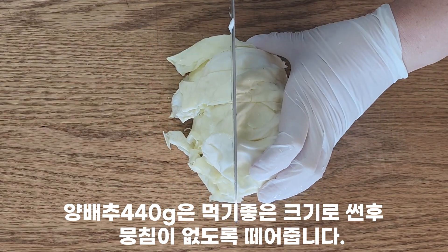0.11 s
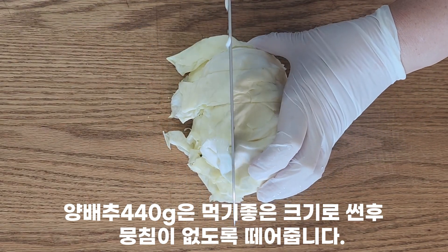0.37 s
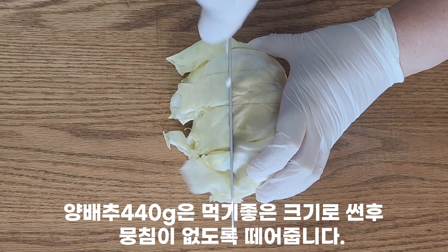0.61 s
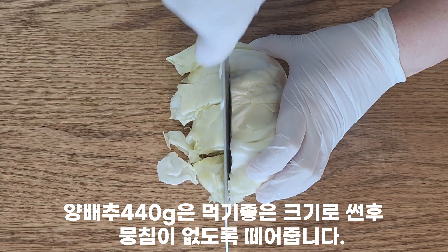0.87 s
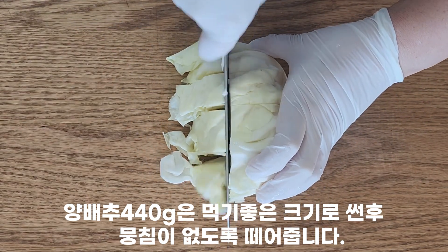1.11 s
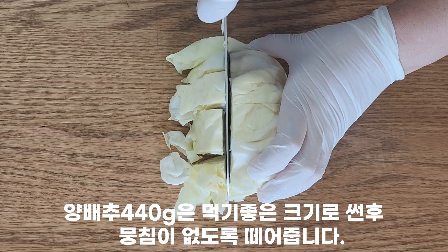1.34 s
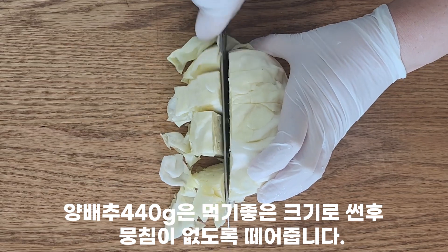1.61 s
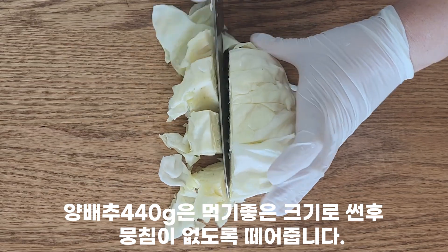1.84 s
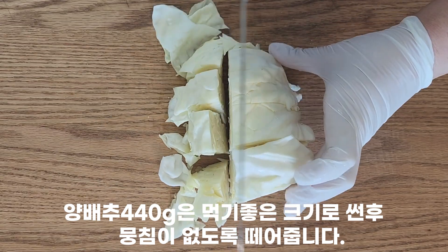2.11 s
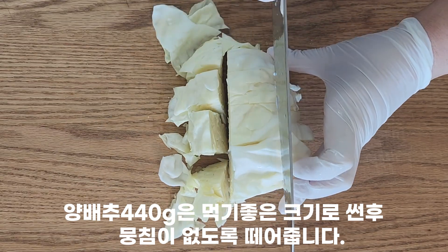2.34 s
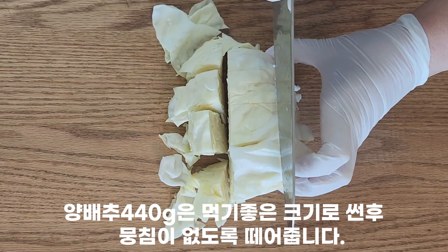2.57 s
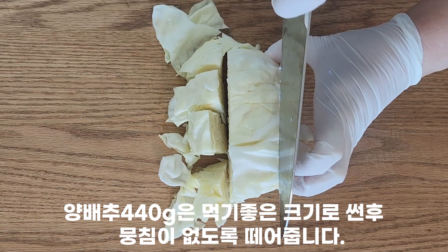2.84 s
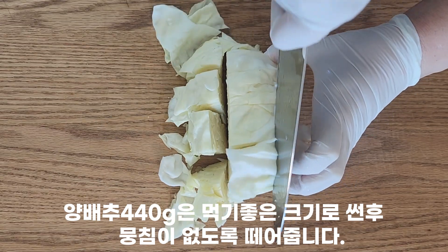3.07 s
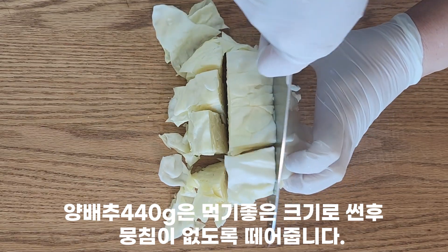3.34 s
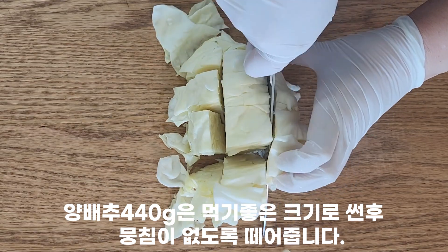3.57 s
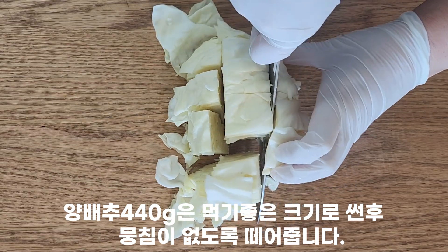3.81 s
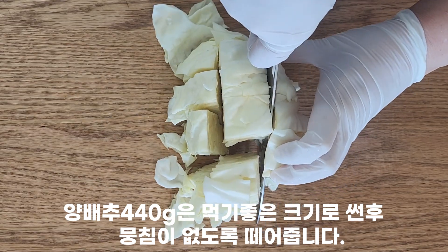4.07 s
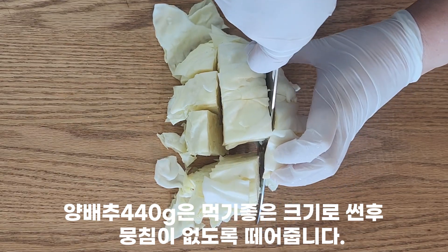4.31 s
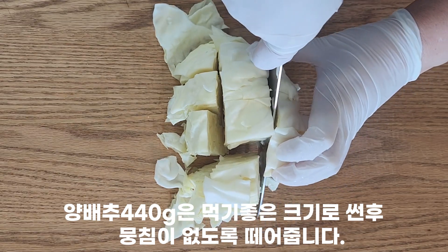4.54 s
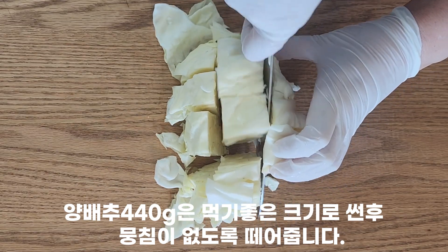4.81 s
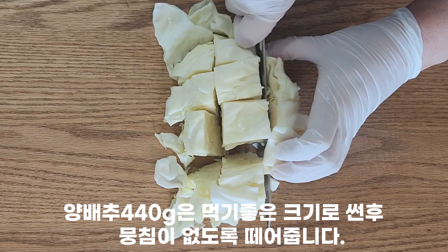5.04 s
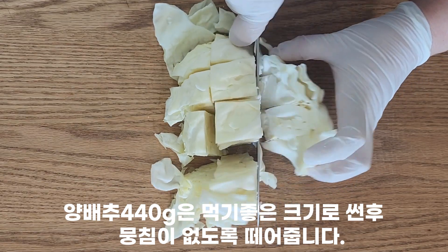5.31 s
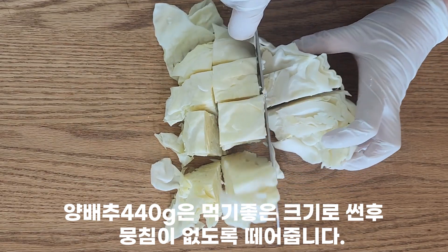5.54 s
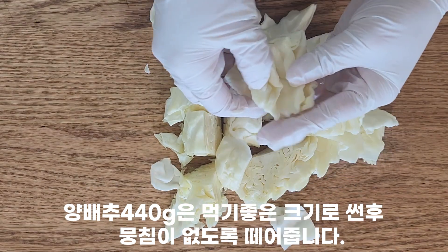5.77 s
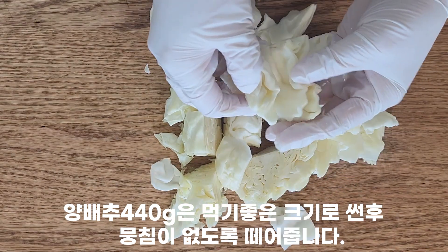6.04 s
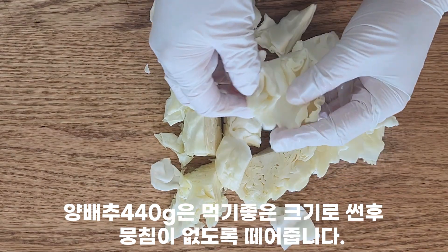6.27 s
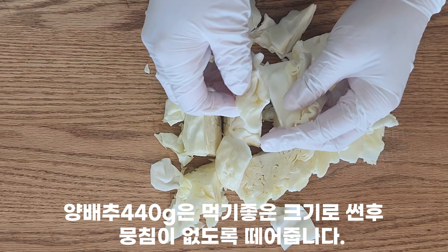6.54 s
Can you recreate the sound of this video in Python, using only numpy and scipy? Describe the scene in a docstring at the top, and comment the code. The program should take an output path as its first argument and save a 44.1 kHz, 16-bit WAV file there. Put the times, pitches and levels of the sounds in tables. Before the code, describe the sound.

Close stereo pickup of a knife forced through raw cabbage on a wooden board. A sharp crack opens a wet, crunchy cut ending in a knock; a second, louder cut follows, then a final hard chop with a strong snap. Low table rumble accompanies the pressure. Afterwards gloved hands peel and tear leaves with light squeaky crackles. The kitchen is hard-walled and lively, with a faint appliance drone.

```python
"""Knife through raw cabbage

A knife is forced through raw cabbage on a wooden board: leaves crunch (clumped random impulses) and ribs snap
(noise bursts with short rings). The blade lands three times (damped board modes), the table rumbles under the
pressure (swelling low noise), then gloved hands pull leaves apart. A hard-walled kitchen answers with decaying
noise tails over a quiet appliance drone; of two close microphones, the left is a little nearer."""
import sys
import numpy as np
from scipy import signal
from scipy.fft import rfft, irfft, next_fast_len
from scipy.io import wavfile
from scipy.ndimage import uniform_filter1d, map_coordinates

SR = 44100
rng = np.random.default_rng(int(sys.argv[2]) if len(sys.argv) > 2 else 0)


def invert_db(x):
    """Field ratio 10**(x/20) for x, a level in decibels (scalar or array-like)."""
    u = np.asarray(x, float) / 20
    return 10 ** u


def generate_wav(signal):
    """Clip the signal to [-1, 1] and save it as 16-bit WAV at the path in sys.argv[1]."""
    frames = np.transpose(np.atleast_2d(signal))
    scaled = np.clip(frames, -1, 1) * 32767
    pcm = np.round(scaled).astype(np.int16)
    wavfile.write(sys.argv[1], SR, pcm)


N = 293265

# spectrum of bursting leaf skin: (frequency [Hz], relative density [dB per Hz])
SKIN_SPECTRUM = [(1470, -44), (2500, -14), (2980, -10.5), (3580, -5.5), (5140, -6), (8320, -9.5),
                 (10200, -13), (15600, -13)]
# delays of the right microphone for three places on the board: (delay [samples], ...)
RIGHT_DELAYS = (3, 5, 8)


def unit(x):
    """Normalization by the root mean square, which becomes 1."""
    return x / np.sqrt(np.mean(x ** 2) + 1e-20)


def along(points, hz):
    """Interpolation of (frequency, value) points on a logarithmic frequency axis."""
    f, v = np.transpose(points)
    return np.interp(np.log(hz + 1), np.log(f + 1), v)


def wobble(rate):
    """Band-limited random modulation: a smooth curve through `rate` random knots a second."""
    knots = rng.standard_normal(int(N * rate / SR) + 4)
    return map_coordinates(knots, [np.arange(N) * rate / SR])


def swell(s, rise, fall, db):
    """Amplitude envelope: a gain that climbs to its peak at s and sinks again."""
    depth_db, roundness = 32.5, 1.45  # drop one rise or fall from the peak; 1 = pointed, 2 = round
    t = np.arange(N) / SR - s
    distance = np.where(t < 0, -t / abs(rise), t / abs(fall))
    return invert_db(db - depth_db * distance ** roundness)


def filtered(x, response):
    """Linear filtering: the spectrum is multiplied by a response of frequency."""
    m = next_fast_len(x.shape[-1] + 8192)
    return irfft(rfft(x, m) * response(np.fft.rfftfreq(m, 1 / SR)), m)[..., :x.shape[-1]]


def diffuse(pair):
    """Diffuse-field coherence: unrelated signals are mixed to share bass between the sides but not treble."""
    # (frequency [Hz], left-right correlation [ratio])
    likeness = [(30, 0.81), (60, 0.99), (130, .9), (290, .77), (640, 0.24), (1400, 0.013)]
    turn = lambda hz: np.arccos(np.clip(along(likeness, hz), -1, 1)) / 2
    mid, side = filtered(pair, lambda hz: np.array([np.cos(turn(hz)), np.sin(turn(hz))]))
    return np.array([mid + side, mid - side])


def near(x, pan_db, lag):
    """Interaural-like level and time differences: a close source is louder left and later right."""
    return np.array([x, np.roll(x, lag)]) * invert_db([[pan_db / 2], [-pan_db / 2]])


def grains(rate, spread_db, clump_db, spectrum):
    """Shot noise of bursting cells: clumped random impulses of uneven but bounded size, coloured by a spectrum."""
    size = invert_db(spread_db * np.minimum(rng.exponential(1, N), 3))
    burst = (rng.random(N) < rate / SR) * rng.standard_normal(N) * size
    clumps = invert_db(clump_db * (wobble(77) + wobble(22)))
    return unit(filtered(burst * clumps, lambda hz: invert_db(along(spectrum, hz))))


def drone():
    """Stationary noise of an appliance, shaped by a spectrum and slightly wavering, with a thin pure tone."""
    # (frequency [Hz], relative density [dB per Hz])
    air_spectrum = [(15, -40.5), (25, -0.5), (107, 0), (133, -6), (210, 0.5), (361, -7.5), (413, -10.5),
                    (652, -13), (788, -21.5), (854, -23.5), (3030, -25.5), (3660, -30), (4420, -24),
                    (5950, -28.5), (15700, -40.5)]
    # thin tone: (frequency [Hz], mean level of the two sides [dB])
    whine_tone = (15096, -86)
    air_db = -59.5
    noise = rng.standard_normal((2, N))
    air = unit(diffuse(filtered(noise, lambda hz: invert_db(along(air_spectrum, hz)))))
    whine_hz, whine_db = whine_tone
    phase = 2 * np.pi * whine_hz * np.arange(N) / SR + [[0], [1.6]]  # the right leads by 1.6 rad
    whine = np.sqrt(2) * invert_db(whine_db + .8 * wobble(8)) * np.sin(phase)
    whine = whine * invert_db([[2.5], [-2.5]])
    return invert_db(air_db + 1.7 * wobble(4.314)) * air + whine


def kitchen(x, piece):
    """Reverberation as decaying noise: each piece of sound gets a fresh tail with its own t60 per frequency."""
    # (frequency [Hz], t60 [s])
    decay_times = [(60, 0.22), (250, 0.55), (1000, 0.59), (2200, 0.53), (3000, 0.4), (6000, 0.49),
                   (14000, 0.51)]
    out = np.zeros((2, N + 2 * SR))
    for i in range(0, N, piece):
        hz, t, z = signal.stft(rng.standard_normal((2, SR * 3 // 4)), SR, nperseg=256)
        decay = invert_db(-60 * t / along(decay_times, hz)[:, None])
        tail = diffuse(signal.istft(z * decay, SR, nperseg=256)[1])
        wet = signal.fftconvolve(x[None, i:i + piece], tail / np.linalg.norm(tail[0]), axes=1)
        out[:, i + 130:][:, :wet.shape[1]] += wet  # the answer starts 130 samples late
    return out[:, :N]


def table():
    """Forced vibration: pressure on the blade shakes the table in uneven lumps; a wavering hum joins late."""
    # (frequency [Hz], relative density [dB per Hz])
    rumble_spectrum = [(15, -24.5), (25, 0.5), (43, 0.5), (59, 9), (81, -3), (134, 0.5), (173, -8),
                       (297, -14.5), (350, -27.5), (460, -38), (770, -120)]
    # weight on the blade: (peak time [s], rise [s], fall [s], level [dB])
    pushes = [(.22, .05, 0.049, -57), (.29, 0.049, .12, -53.5), (.43, 0.036, 0.096, -36),
              (.558, 0.029, 0.02, -38.5), (0.779, 0.33, 0.32, -34), (1.17, 0.096, 0.27, -35),
              (1.505, 0.065, 0.017, -38), (1.6, .05, 0.12, -56), (1.81, 0.24, 0.037, -60.5),
              (1.882, .03, 0.19, -58), (2.69, .15, .1, -58), (2.974, 0.27, 0.065, -57),
              (3.11, 0.098, 0.26, -36.5), (3.29, 0.044, 0.096, -33.5), (3.475, 0.15, 0.074, -34),
              (3.63, 0.042, 0.047, -45), (3.706, 0.02, 0.085, -40.5), (3.896, 0.15, 0.049, -49),
              (4.631, .08, 0.17, -54), (4.898, .02, 0.05, -28.5), (5.0, 0.14, 0.086, -40),
              (5.065, 0.066, 0.055, -39), (5.2, 0.11, 0.099, -43.5), (5.772, 0.048, 0.32, -51.5),
              (6.088, .04, 0.076, -63), (6.2, .12, 0.092, -57)]
    # hum while the hands work: (peak time [s], rise [s], fall [s], level [dB], frequency [Hz])
    hum_swells = [(5.789, .1, 0.12, -47, 95), (5.95, 0.21, .13, -52.5, 93), (6.09, 0.085, .08, -56, 96.7),
                  (6.25, 0.21, 0.22, -58, 103.1), (6.511, 0.24, .13, -59, 106)]
    noise = rng.standard_normal((2, N))
    shake = diffuse(filtered(noise, lambda hz: invert_db(along(rumble_spectrum, hz))))
    rumble = sum(swell(*row) for row in pushes) * unit(shake * invert_db(0.46 * wobble(30)))
    hum = sum(swell(*row) * np.sin(2 * np.pi * hz * np.arange(N) / SR) for *row, hz in hum_swells)
    return rumble + np.sqrt(2) * invert_db(1.3 * wobble(60)) * hum


def settling():
    """Sparse shot noise: cut leaves shift and tick faintly all the while; rows: left, right, room feed."""
    tick = invert_db(-72.5) * grains(46, spread_db=1.0, clump_db=5.5, spectrum=SKIN_SPECTRUM)
    return np.vstack([near(tick, 1.5, RIGHT_DELAYS[1]), tick])


def rubbing():
    """Sliding friction: the flat of the blade rubs cut leaf in fine grains; rows: left, right, room feed."""
    # (frequency [Hz], relative density [dB per Hz])
    blade_spectrum = [(700, -39.5), (1100, -12.5), (1500, -9), (2200, 1.5), (2600, -8.5), (3200, -19.5),
                      (6000, -64.5)]
    # (peak time [s], rise [s], fall [s], level [dB])
    rubs = [(1.9, 0.24, 0.069, -63.5), (2.66, 0.035, .06, -61), (2.9, 0.41, .15, -65),
            (3.07, 0.08, 0.11, -46.5), (3.87, 0.24, 0.15, -51.5), (4.38, 0.09, 0.11, -59.5),
            (4.55, 0.25, 0.28, -62), (4.74, 0.053, 0.064, -64.5), (4.95, 0.18, 0.17, -43)]
    friction = grains(1200, spread_db=-1.0, clump_db=2.0, spectrum=blade_spectrum)
    rub = sum(swell(*row) for row in rubs) * friction
    return np.vstack([near(rub, 1.2, RIGHT_DELAYS[1]), rub])


def slips():
    """Stick-slip friction: each creak is a run of small snaps that come faster and louder."""
    # edge on leaf skin, glove on wet leaf:
    # (start [s], end [s], first gap [s], level at the end before scatter and crest [dB], mean ring [Hz])
    creaks = [(2.7215, 2.936, .029, -39, 2470), (5.735, 5.826, 0.014, -27, 4700),
              (6.097, 6.135, 0.0051, -29.5, 5500)]
    gap_shrink = .93  # next gap over the last
    growth_db, scatter_db, crack_db = 8, 2, -12
    rows = []
    for (start, end, gap, db, hz), chance in zip(creaks, rng.standard_normal((len(creaks), 16))):
        times = start + gap * (1 - gap_shrink ** np.arange(len(chance))) / (1 - gap_shrink)
        for s, c in zip(times, chance):
            if s <= end:
                level = db - growth_db * (end - s) / (end - start) + scatter_db * c
                rows.append((s, level, hz * (1 + 0.0596 * c), crack_db))
    return rows


def snaps():
    """Brittle fracture: each rib breaks with a broad crack and a brief ring; rows: left, right, room feed."""
    # single ribs: (time [s], level before the crest [dB], ring [Hz], crack treble before its crest [dB])
    ribs = [(0.193, -45, 5710, -14), (0.2746, -19.5, 1900, -12), (0.3494, -40, 2180, -12),
            (0.3666, -35.5, 1920, -3), (0.3835, -27.5, 3120, -8.5), (0.4124, -33.5, 1980, -13),
            (0.4359, -38, 1590, -14.5), (0.4633, -39, 2050, -15), (0.5053, -36, 1500, -15),
            (0.5487, -36.5, 1580, -7), (0.5846, -29.5, 7460, -11), (0.6045, -32.5, 7380, -9),
            (1.1079, -35.5, 1010, -15), (1.477, -31, 1030, -12.5), (1.7454, -35, 1870, -16),
            (2.4927, -45.5, 4510, -19), (2.6564, -43, 2110, -16.5), (2.803, -39.5, 2270, -11),
            (2.8419, -34.5, 2240, -15), (2.8714, -32.5, 3660, -16.5), (2.9049, -31.5, 3940, -16.5),
            (2.9532, -23.5, 2510, -21), (2.9564, -23, 3590, -21.5), (3.0265, -26.5, 5730, -12),
            (3.0495, -25, 2080, -14), (3.0664, -24.5, 2230, -15.5), (3.1163, -18.5, 2240, -12.5),
            (3.2505, -28.5, 3690, -13), (3.2665, -25, 1200, -16), (3.2819, -26, 2210, -14),
            (3.3967, -32, 1130, -11), (3.8674, -36, 1980, -15), (4.4687, -38, 4380, -11.5),
            (4.5246, -39.5, 2100, -13), (4.5521, -38, 6150, -11), (4.7336, -42, 2440, -12),
            (4.8544, -32.5, 2080, -19), (4.8928, -34, 2270, -15), (4.9432, -31.5, 1310, -21),
            (5.0564, -15.5, 1340, -16), (5.3244, -35, 1850, -24), (5.4575, -42.5, 1280, -10.5),
            (5.5154, -39.5, 1270, -12.5), (5.6251, -43, 4280, -20), (5.8631, -35, 6270, -10),
            (5.9668, -37, 5440, -7), (5.9933, -32.5, 3570, -15), (6.0634, -48, 5030, -13),
            (6.0856, -35, 5010, -2.5), (6.2632, -41, 4970, -9), (6.5161, -43, 5370, -10),
            (6.5595, -40, 5660, -10)]
    crest_db, crack_crest_db = 3.5, 13  # added to the level and to the treble
    body_db, thin_db_per_octave = -3, 7  # thin ribs ring higher and have less body
    ring_cycles, break_s = 10, 0.0049  # cycles to fall 60 dB; t60 of the fibres parting
    out, t = np.zeros((3, N + SR)), np.arange(SR // 40) / SR
    breaks = [*ribs, *slips()]
    noise = rng.standard_normal((len(breaks), len(t)))
    for (s, db, hz, crisp_db), fizz in zip(breaks, noise):
        crack = np.diff(uniform_filter1d(fizz, size=3), prepend=0)
        crack = invert_db(crisp_db + crack_crest_db - 60 * t / 0.016) * crack
        # the thick of the rib
        body = np.diff(uniform_filter1d(fizz[::-1], size=8), prepend=0)
        body = invert_db(body_db - thin_db_per_octave * np.log2(hz / 2000) - 60 * t / 0.004) * body
        # parting fibres excite the ring
        ring = np.sin(2 * np.pi * hz * t) * invert_db(-60 * t * hz / ring_cycles)
        ring = signal.fftconvolve(ring, fizz * invert_db(-60 * t / break_s))[:len(t)]
        ring = ring / np.abs(ring).max()
        snap = (crack + body + ring) * (1 - np.exp(-t / .0005))
        snap = invert_db(db + crest_db) * snap / np.abs(snap).max()
        lag = RIGHT_DELAYS[np.digitize(fizz[-1], [-.6, .6])]  # random place on the board
        out[:, round(s * SR):][:, :len(t)] += np.vstack([near(snap, 1.5, lag), snap])
    return out[:, :N]


def chops():
    """Modal impact: the edge strikes the board and its damped modes ring, low and middle weighted by the blow."""
    # landings: (time [s], overall gain [dB], low-mode weight [dB], edge noise before its decay [dB])
    landings = [(1.525, -17, -10.5, -1.5), (3.5181, -10.5, -10.5, -1), (5.0875, -4.5, -15, -12.5)]
    # board and table: (frequency [Hz], level before weighting [dB], t60 [s])
    board_modes = [(53.1, -7.5, 0.15), (162, 3.5, 0.032), (233, 0, 0.039), (290, 7.5, 0.022),
                   (386, 3, 0.039), (443.3, -3.5, 0.05), (552, -7.5, 0.11), (678, 9.5, 0.015),
                   (883, -8, 0.016), (1040, 7, 0.019), (1468, 15, 0.0063), (1809, 11, 0.0078),
                   (2100, 16, 0.0048), (2470, 24, 0.002)]
    knock_db, click_db = 10.5, 3.73  # middle modes over the weight; weighting of the top modes
    out, t = np.zeros((3, N + SR)), np.arange(SR // 3) / SR
    draws = rng.standard_normal((len(landings), len(board_modes) + len(t)))
    # leaf under the edge cushions the blow
    contact = np.sin(np.pi * np.minimum(t[:SR // 500] / .0006, 1)) ** 2
    # the edge rolls down onto the wood
    landing = np.sin(np.pi / 2 * np.minimum(t / .0005, 1)) ** 2
    for (s, db, weight_db, edge_db), draw in zip(landings, draws):
        middle_db = weight_db + knock_db
        share = [(250, weight_db), (600, middle_db), (1000, middle_db), (1400, 0.017), (2100, click_db)]
        ring = np.zeros(len(t))
        for (hz, level, t60), scatter in zip(board_modes, draw):
            decay = invert_db(level + along(share, hz) + scatter - 60 * t / t60)
            ring -= decay * np.sin(2 * np.pi * hz * t)
        ring = np.convolve(landing * ring, contact / contact.sum())[:len(t)]
        # steel cracks on wood
        smooth = uniform_filter1d(uniform_filter1d(draw[len(board_modes):], size=5), size=3)
        scrape = unit(np.diff(smooth, prepend=0))
        edge = invert_db(edge_db) * invert_db(-60 * t / .012) * landing * scrape
        blow = invert_db(db) * (ring + edge)
        out[:, round(s * SR):][:, :len(t)] += np.vstack([near(blow, 1.0, RIGHT_DELAYS[1]), blow])
    return out[:, :N]


def leaves():
    """Shot noise of tearing: bright crackle of skin and duller crunch of ribs; rows: left, right, room feed."""
    # blade or hand tears leaf: (peak time [s], rise [s], fall [s], crackle level [dB], crunch level [dB])
    tears = [(.195, 0.037, 0.082, -64.5, -71), (0.277, .006, 0.041, -32, -47),
             (0.422, 0.18, .15, -47.5, -53), (0.671, 0.29, 0.13, -44.5, -45), (.78, 0.17, 0.12, -40, -38.5),
             (.85, 0.092, 0.031, -45, -45.5), (.95, .1, 0.12, -54.5, -55.5),
             (1.13, 0.046, .1, -48.5, -42.5), (1.209, .12, 0.099, -33.5, -32.5),
             (1.517, 0.091, 0.02, -32, -35.5), (1.66, 0.059, 0.023, -68, -47.5),
             (1.756, .06, .07, -45.5, -50), (1.898, .1, 0.061, -61, -60.5), (2.09, 0.12, .05, -62.5, -72.5),
             (2.284, 0.11, 0.036, -55.5, -66), (2.664, 0.031, 0.013, -55.5, -54),
             (2.87, 0.29, .15, -54.5, -75), (2.956, .02, 0.11, -49.5, -64.5),
             (3.064, 0.024, 0.035, -28.5, -37.5), (3.12, 0.03, 0.14, -38, -38),
             (3.286, 0.041, .08, -33.5, -33.5), (3.421, .06, 0.14, -36.5, -39.5),
             (3.504, 0.05, 0.022, -30.5, -32), (3.699, 0.06, 0.074, -58, -46),
             (3.859, 0.07, 0.072, -45, -47), (4.4, .12, 0.031, -50, -65.5),
             (4.52, 0.077, 0.078, -50.5, -78.5), (4.599, 0.048, 0.023, -41, -53),
             (4.741, 0.027, 0.038, -51.5, -64), (4.871, 0.079, 0.17, -47.5, -52.5),
             (5.0, 0.18, 0.19, -44, -52.5), (5.07, 0.035, 0.031, -26.5, -27.5),
             (5.3, 0.12, 0.47, -55, -59.5), (5.748, 0.015, 0.13, -35, -63), (5.814, 0.066, .03, -46, -70),
             (5.971, 0.018, 0.049, -45.5, -67), (6.134, .03, .03, -37, -58),
             (6.279, 0.054, 0.078, -46.5, -72), (6.36, 0.051, 0.035, -44, -57.5),
             (6.414, 0.034, 0.035, -46, -62.5), (6.552, 0.077, 0.099, -49, -63)]
    # breaking ribs: (frequency [Hz], relative density [dB per Hz])
    rib_spectrum = [(180, -44.5), (300, -31), (380, 1.5), (556, -3), (856, 4), (929, 0), (1170, 2),
                    (3500, 2), (4550, -22), (7700, -120)]
    shapes = np.array([swell(s, rise, fall, 0) for s, rise, fall, *_ in tears])
    crackle, crunch = invert_db(np.transpose(tears)[3:]) @ shapes
    out = np.zeros((3, N))
    for lag in RIGHT_DELAYS:  # independent grains at each place along the blade
        bright = crackle * grains(4000, spread_db=4.5, clump_db=2.5, spectrum=SKIN_SPECTRUM)
        dull = crunch * grains(2000, spread_db=1.5, clump_db=2.0, spectrum=rib_spectrum)
        leaf = (bright + dull) / np.sqrt(len(RIGHT_DELAYS))
        out += np.vstack([near(leaf, 0.85, lag), leaf])
    return out


def scene():
    """Superposition of the near sounds, their shares of room, the table and the drone."""
    leaf, snap, chop = leaves() + rubbing(), snaps() + settling(), chops()
    room_feed = invert_db(-5.5) * leaf[2] + invert_db(-8.0) * snap[2] + invert_db(-1.5) * chop[2]
    direct = leaf[:2] + snap[:2] + chop[:2]
    return direct + kitchen(room_feed, SR // 4) + table() + drone()


def roll_off(x):
    """The treble ends steeply here."""
    return signal.sosfilt(signal.butter(12, 17010, fs=SR, output="sos"), x)


def record(dry):
    """Transducer response: microphones lose the deepest bass and soften the top; the recorder saturates softly."""
    top_hz, ceiling = 15750, .98  # sharp band limit; full-scale fraction never exceeded

    def colour(hz):
        bass_loss = (1j * hz / (42 + 1j * hz)) ** 2
        return (hz < top_hz) * bass_loss / (1 + 1j * hz / 17000) ** 2

    heard = filtered(dry, colour)
    finished = heard / (1 + np.abs(heard / ceiling) ** 6) ** (1 / 6)
    return roll_off(finished)


dry = scene()
out = record(dry)
generate_wav(out)
```